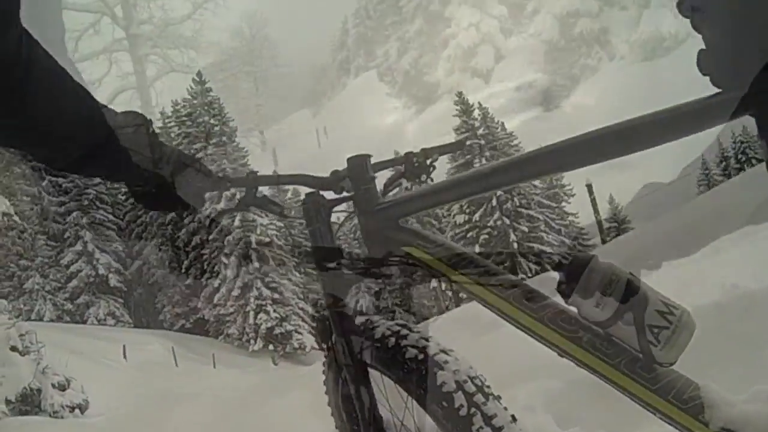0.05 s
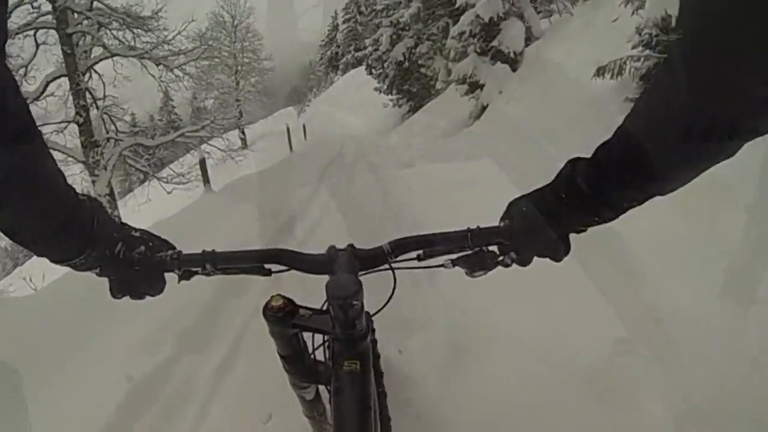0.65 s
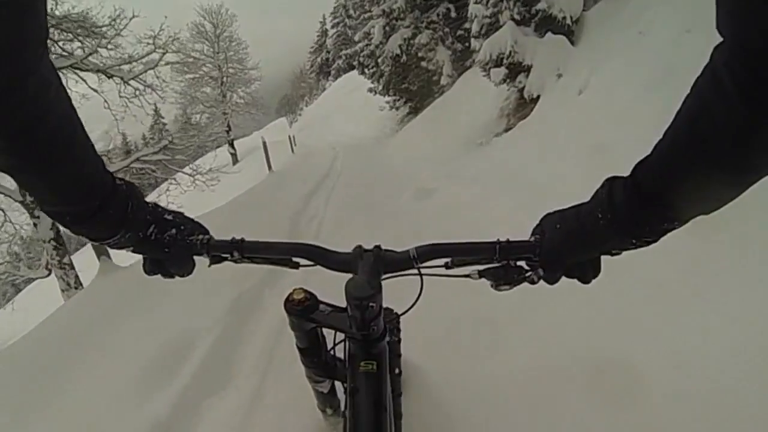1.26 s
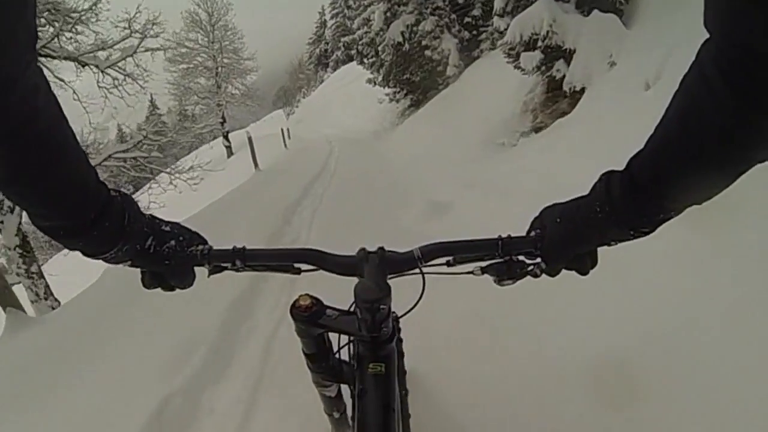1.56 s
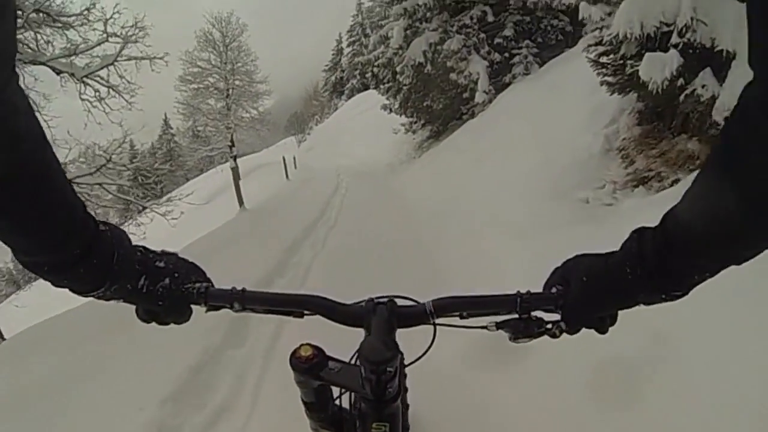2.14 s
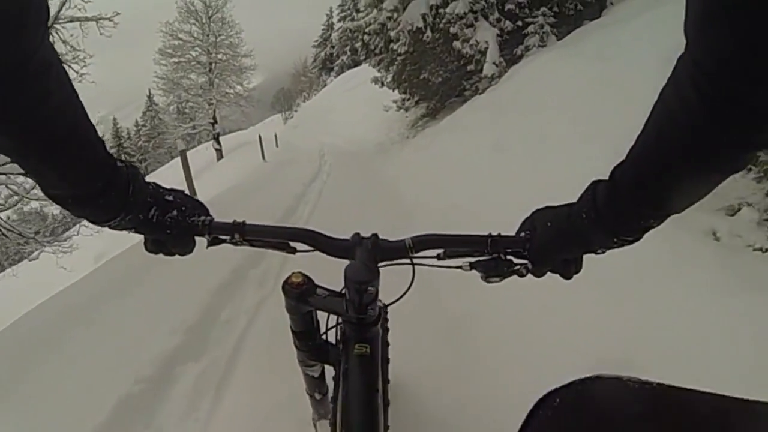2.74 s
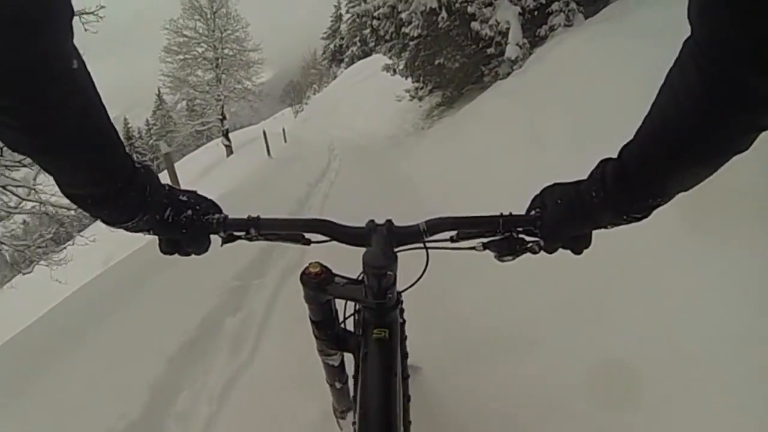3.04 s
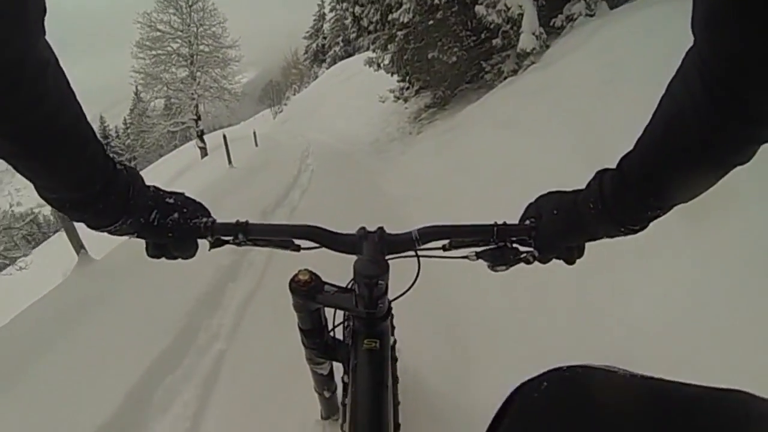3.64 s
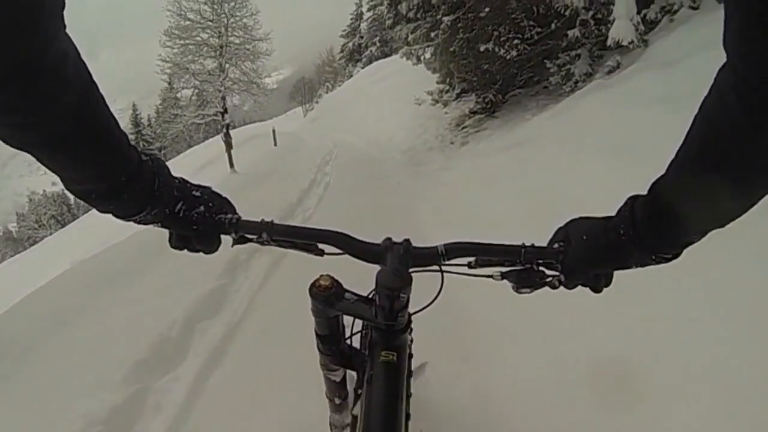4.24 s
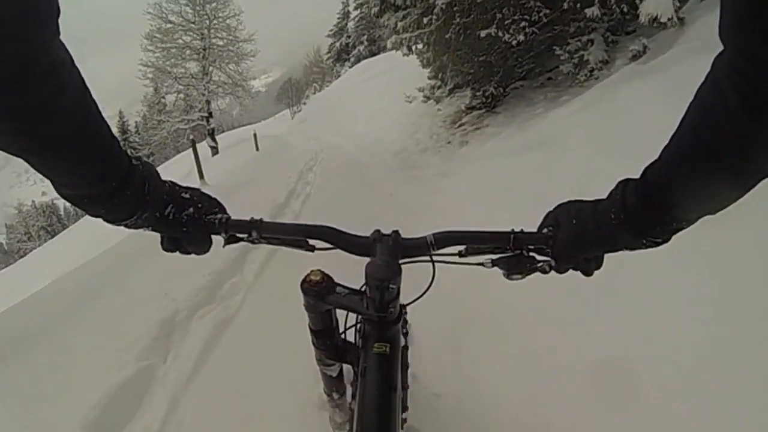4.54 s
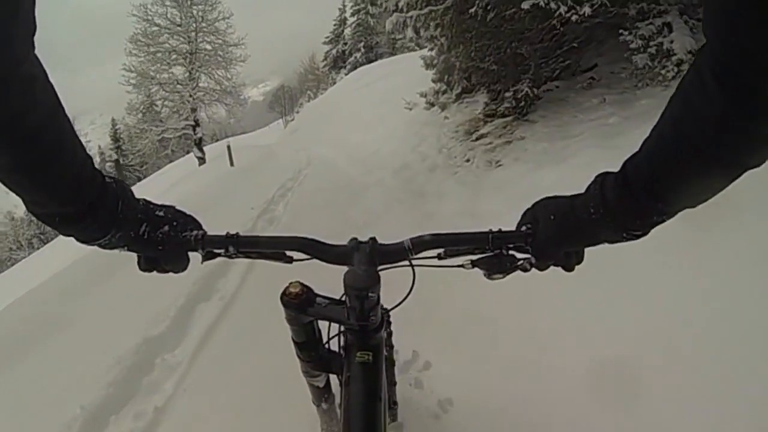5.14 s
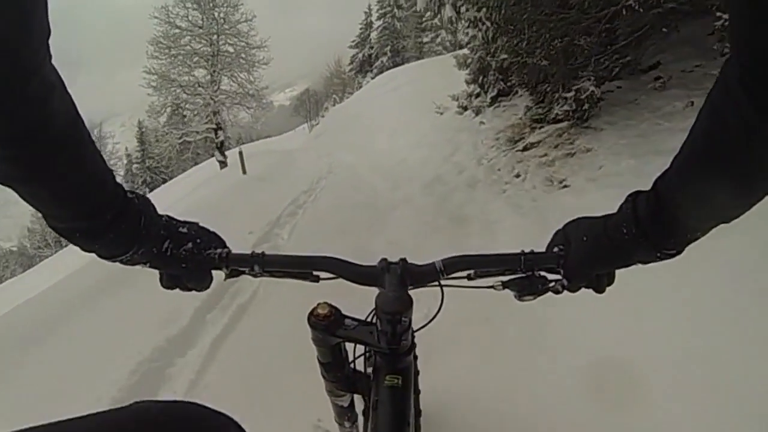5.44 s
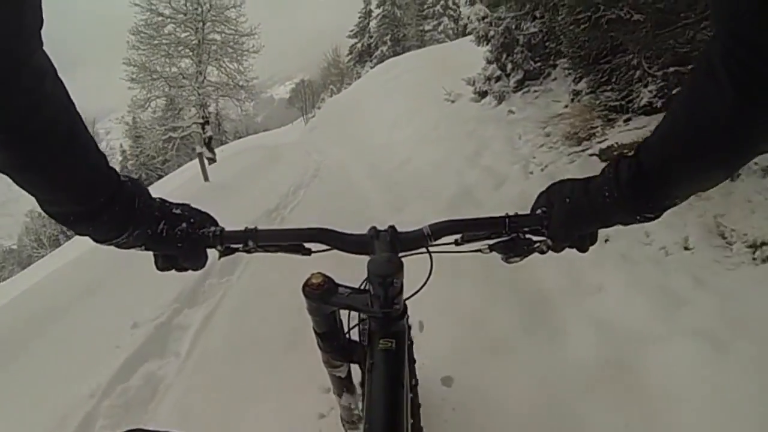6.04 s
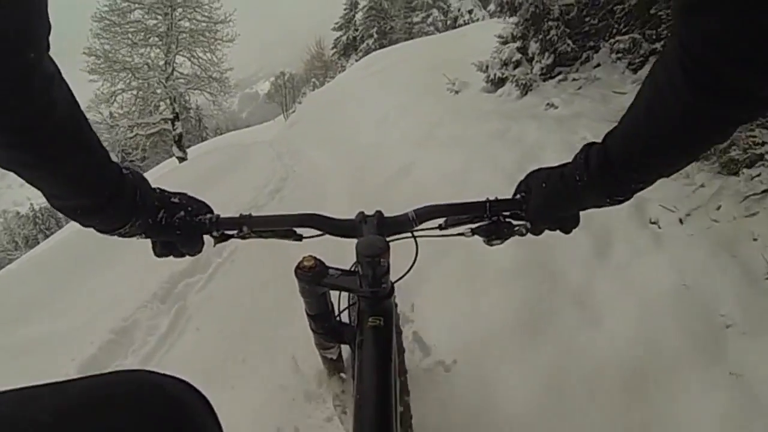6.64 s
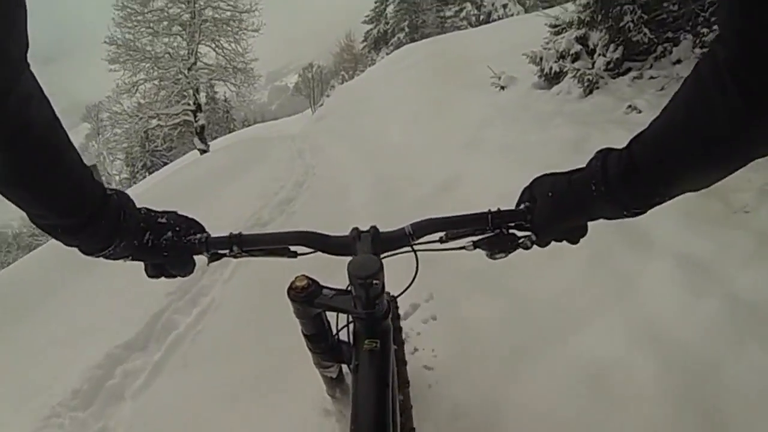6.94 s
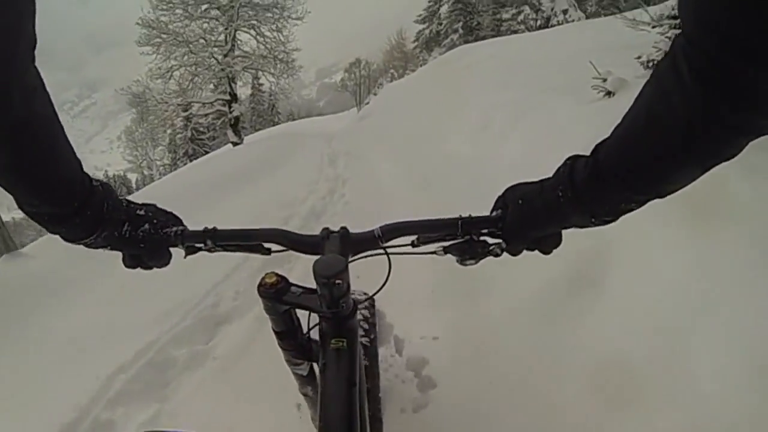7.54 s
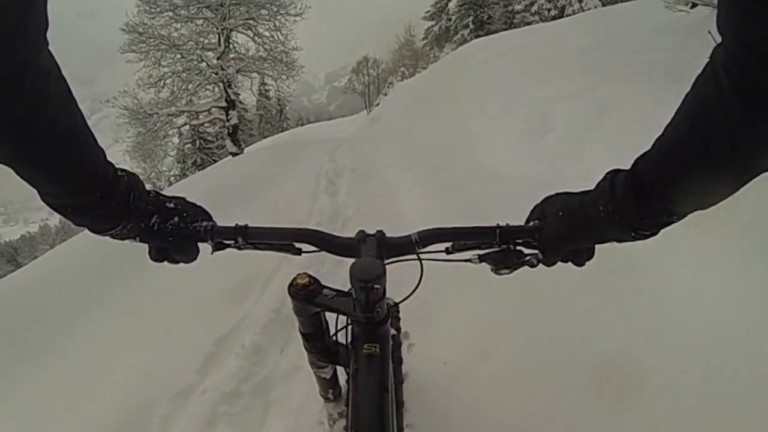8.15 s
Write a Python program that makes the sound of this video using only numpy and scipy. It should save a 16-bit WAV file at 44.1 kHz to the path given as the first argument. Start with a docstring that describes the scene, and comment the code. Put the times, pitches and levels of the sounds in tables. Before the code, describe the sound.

A mountain bike rides through snow, heard from a chest-worn microphone in a closed plastic case that makes everything boxy. Deep wind rumble and uneven buffeting run throughout, over a soft tyre crunch. A cluster of dull thuds comes at about 1 second, and a very faint brake scrape near 2. From 2 to 5.5 seconds the crunch and snow spray surge with the pedalling, nearly three times a second. Snow crumbs and grit tick irregularly on the shell from about 2.7 to 6 seconds, with soft bumps near 4 and 5.4. A muffled knock comes at 6.6 seconds. Just before 7, a hard double knock with a deep thump strikes the case, by far the loudest event. The ride drops in level and swells back over about a second, with a few small knocks, ticks and another faint scrape. Wind and tyres continue until about 8.4 seconds.

```python
"""Mountain bike on snow

A bike rolls along a snowy track, heard from a chest camera in a closed plastic housing.
Wind rumbles and buffets on the case; the tyres crunch and spray snow with each pedal stroke.
Crumbs tick on the shell, bumps thud through the mount and the brake gives a few faint scrapes.
A hard double knock on the case ducks the gain control, and the ride swells back in about a second."""
import sys
import numpy as np
from scipy import signal
from scipy.fft import rfft, irfft, next_fast_len
from scipy.io import wavfile
from scipy.ndimage import uniform_filter1d

SR = 44100
rng = np.random.default_rng(int(sys.argv[2]) if len(sys.argv) > 2 else 0)


def output_pcm(signal):
    """Save a mono or channel-first signal as 16-bit PCM at the path in sys.argv[1].

    Samples are clipped to [-1, 1] before scaling.
    """
    pcm = np.clip(np.atleast_2d(signal).T, -1, 1) * 32767
    wavfile.write(sys.argv[1], SR, np.round(pcm).astype(np.int16))


N = 369999
TIME = np.arange(N) / SR

# EQ curves of the noise layers: f/Hz, relative level/dB
HISS_EQ = [(1000, -13), (9400, -13), (9900, -9), (10300, -9), (10600, -5), (11150, -1.5), (11700, -7),
           (12300, -11), (13500, -36.5), (15000, -40)]
RUMBLE_EQ = [(8, -9.5), (16, 4), (25, -2), (35, 2.5), (45, -16.5), (60, -19.5), (90, -29.5), (130, -41),
             (250, -92)]
BUFFET_EQ = [(50, -4), (90, -4.5), (165, 0), (250, -7), (320, -8.5), (430, -16.5), (600, -18.5), (800, -25),
             (1500, -25), (3000, -46), (8000, -63.5)]
GRIT_EQ = [(1000, -14), (1600, 8), (3000, -3), (5000, 3), (7000, -13), (9500, -3.5), (13000, -15)]
CRUNCH_EQ = [(300, -16), (700, -14), (1150, -19), (1480, -8), (1780, -15), (2050, -16), (2500, -19),
             (3300, -23.5), (3800, -26.5), (6000, -41.5), (12000, -60)]
SPRAY_EQ = [(1000, -17), (2500, 3.5), (3500, -0.5), (4500, 2.5), (5600, -1.5), (7000, -3.5), (8000, -2),
            (9400, -12), (12000, -11), (15000, -22.5)]
# air and wall resonances of the housing: f/Hz, width/Hz, boost/dB
HOUSING_PEAKS = [(970, 66, 10.5), (1420, 250, 7.5), (1570, 94, 7), (2940, 83, 3.5), (3100, 380, 6),
                 (5110, 190, 6)]
# faint whine of the electronics: f/Hz, level/dB
WHINE_TONES = [(2640, -91.5), (2880, -77), (3120, -80.5)]
# fader moves for gusts on the case and for small eddies at its edges: t/s, level before trim/dB
RUMBLE_FADER = [(0.0, -24), (0.09, -26.5), (0.49, -39), (0.54, -31), (1.66, -37), (1.84, -27.5),
                (1.93, -36.5), (2.03, -31), (2.05, -37.5), (2.52, -27.5), (2.59, -32.5), (3.24, -33.5),
                (3.26, -20.5), (3.34, -35.5), (3.55, -27), (3.66, -43), (3.76, -27), (3.92, -37.5),
                (4.06, -24.5), (4.11, -35.5), (4.18, -30), (4.67, -29), (5.06, -35), (5.11, -26),
                (5.25, -44), (5.34, -31), (6.09, -31), (6.14, -19), (6.18, -39.5), (6.25, -26),
                (6.49, -35.5), (6.56, -26), (6.65, -32.5), (6.72, -24.5), (6.86, -40), (6.93, -13.5),
                (6.98, -27), (7.16, -29), (7.89, -28.5), (8.03, -32.5), (8.1, -19.5), (8.24, -31.5),
                (8.29, -25.5), (8.38, -35)]
BUFFET_FADER = [(0.0, -48), (0.3, -51.5), (0.85, -49.5), (0.95, -45), (1.3, -49), (2.5, -47), (2.62, -52),
                (2.8, -48.5), (3.95, -48), (4.12, -51), (4.3, -49.5), (4.9, -46.5), (5.1, -53.5),
                (5.55, -50), (5.63, -48), (5.7, -51), (5.78, -49), (6.0, -48), (6.15, -45.5), (6.26, -40.5),
                (6.33, -48), (6.41, -41), (6.5, -45), (6.9, -44), (7.75, -44), (7.82, -49), (7.95, -49),
                (8.08, -43), (8.38, -44)]
# thin scrapes, like a brake disc brushing its pads: t/s, length/s, f/Hz, width/Hz, level/dB
BRAKE_RUBS = [(1.935, 0.19, 8160, 1500, -73), (1.94, 0.23, 5100, 260, -77), (7.562, 0.2, 4950, 200, -67.5),
              (7.62, 0.16, 6450, 400, -75)]
# dry ticks, like ice grit and the chain: t/s, peak/dB, low cut/Hz, high cut/Hz
DRY_TICKS = [(2.8485, -46, 1500, 5200), (2.955, -47, 1500, 4300), (3.0665, -46, 2200, 7000),
             (3.114, -42, 1700, 5200), (3.126, -51, 2000, 7000), (3.234, -46, 1500, 5000),
             (3.3718, -49.5, 2000, 10000), (3.409, -44, 1500, 4720), (3.496, -44, 1800, 3800),
             (3.8622, -51, 3000, 9000), (4.0191, -48, 2300, 4200), (4.394, -43, 1400, 4190),
             (4.959, -45, 1400, 4000), (4.98, -50, 2010, 4600)]
# the chest mount swinging after a bump: f/Hz, relative level/dB, t60/s
MOUNT_RING = [(88.5, -0.5, 0.084), (184, -1.5, 0.048), (363, -1, 0.029)]
# mount thuds from bumps in the track, and the low thump of the mount under the hard double knock at 6.94 and
# 6.98 s: t/s, peak/dB, high cut/Hz
MOUNT_THUDS = [(0.927, -40, 500), (0.958, -28, 159), (1.007, -23, 422), (1.1, -30.5, 600), (3.982, -26, 257),
               (5.362, -30, 280), (6.581, -30, 684), (6.9428, -5, 130), (6.984, -7.5, 120), (7.131, -24, 398),
               (7.738, -26.5, 201)]
# the shell flicked by a crumb: f/Hz, relative level/dB, t60/s
SHELL_RING = [(1200, -42, 0.0089), (1441, 14.5, 0.021), (1502, 14.5, 0.04), (1950, -8, 0.0082),
              (3060, -1, 0.0099), (3940, -31, 0.0049), (5040, -32, 0.0077)]
# the biggest snow crumbs: t/s, peak/dB, ring pitch/Hz, snap relative to the ring/dB
BIG_CRUMBS = [(2.7588, -31.5, 1490, -15), (2.765, -41, 1610, -26), (2.7841, -35.5, 1470, -12),
              (2.92, -44, 1480, -22), (3.0777, -33.5, 1410, -12), (3.1722, -39, 1500, -20),
              (3.4835, -42, 1550, -24), (3.5902, -33, 1490, -6.5), (3.63, -40, 1530, -22),
              (3.809, -32.5, 1503, -12.5), (3.8212, -34.5, 1510, -18), (3.8627, -30, 1510, -19),
              (3.934, -40.5, 1530, -26), (4.02, -42, 1550, -14), (4.2732, -40.5, 1453, -11),
              (4.3424, -42, 1520, -22), (4.3515, -33.5, 1553, -16), (4.6163, -36.5, 1550, -20),
              (4.622, -41, 1520, -24), (4.7087, -35.5, 1477, -11), (4.9057, -28.5, 1490, -20),
              (5.0828, -42, 1575, -26), (5.3265, -36.5, 1500, -19), (5.3455, -31.5, 1506, -21),
              (5.6277, -42.5, 1510, -22), (5.9254, -33.5, 1466, -29.5), (7.685, -36, 1450, -28),
              (7.717, -35.5, 1500, -16)]
# fader moves for the rolling tyres, before trim: t/s, crunch/dB, spray/dB
TYRE_FADERS = [(0.0, -56, -72.5), (0.8, -56, -69.5), (1.6, -57, -72), (2.2, -56, -68.5), (4.5, -58, -68),
               (5.4, -61, -68.5), (6.9, -53, -70.5), (7.3, -56.5, -65), (7.8, -56.5, -71.5),
               (8.38, -59.5, -71)]
# the tyre digs in, mostly on a pedal stroke: centre t/s, length/s, crunch boost/dB, spray boost/dB
TYRE_SURGES = [(0.94, 0.17, 6.5, -1), (2.006, 0.44, 3.5, 1.5), (2.423, 0.23, 3.5, 5),
               (2.748, 0.47, 4.5, 4.5), (3.155, 0.29, 6, 3), (3.58, 0.34, 4, 6), (3.898, 0.28, 1, 3.5),
               (4.039, 0.23, 9.5, -1.5), (4.343, 0.29, 3, 5.5), (4.674, 0.28, 8, 4.5),
               (5.034, 0.34, 4.5, 6.5), (5.317, 0.4, 9.5, 5), (5.9, 0.13, 2.5, 2), (7.704, 0.31, 4, 5)]
# the case under a blow, and a thin after-ring like a metal buckle: f/Hz, relative level/dB, t60/s
CASE_RING = [(105, -15.5, 0.034), (164, -7, 0.045), (314, -8, .016), (453, -11.5, .017), (615, -16, 0.032),
             (725, -15, 0.04), (912, -10.5, 0.031), (1291, -2.5, 0.019), (1490, -0.5, 0.015),
             (1855, 0.5, 0.016), (2045, -1, 0.015), (2565, -7.5, .012), (2973, -6, 0.015),
             (4000, -18.5, 0.016), (4220, -15, 0.0099), (5430, -18.5, 0.0105), (6520, -16.5, 0.0073),
             (9010, -13.5, 0.0041)]
BUCKLE_RING = [(3250, 0, 0.057), (5160, -9.5, 0.04)]
# knocks on the case; the row at 6.93 s is a brief dull burst leading into the hard double knock:
# t/s, peak before gain control/dB, high cut/Hz, ring pitch/Hz
KNOCKS_AND_LEAD_IN = [(1.0055, -32.5, 636, 1890), (6.5805, -17, 1110, 1960), (6.9303, -6.5, 797, 1930),
                      (6.9405, 20, 6000, 1870), (6.9835, 12.5, 4800, 1935), (7.043, -30, 900, 1870),
                      (7.132, -28.5, 500, 1860), (7.393, -33, 800, 1880), (7.636, -32, 550, 1870),
                      (7.736, -23, 500, 1880), (7.875, -32, 634, 1950)]

SHELL_PITCH_HZ, CASE_PITCH_HZ = 1488, 1863  # root pitches of SHELL_RING and CASE_RING


def from_db(db):
    """Decibels to gain."""
    return 10 ** (np.asarray(db) / 20)


def rms_one(x):
    """Normalise to an rms of 1."""
    return x / np.sqrt(np.mean(x ** 2) + 1e-20)


def peak_one(x):
    """Normalise to a peak of 1."""
    return x / np.abs(x).max()


def low_pass(x, hz):
    """Second-order high cut."""
    return signal.sosfilt(signal.butter(2, min(hz, SR / 2 - 1), fs=SR, output="sos"), x)


def high_pass(x, hz):
    """Second-order low cut."""
    return signal.sosfilt(signal.butter(2, hz, "high", fs=SR, output="sos"), x)


def equalise(x, curve):
    """Shape a steady sound with an EQ curve; rms 1."""
    size = next_fast_len(N)
    hz, db = np.transpose(curve)
    bins = np.arange(size // 2 + 1) * SR / size
    gain = from_db(np.interp(np.log(bins + 1e-9), np.log(hz), db))
    return rms_one(irfft(rfft(x, size) * gain, size)[:N])


def automation(rows):
    """Straight ramps between breakpoints, one curve for each level column."""
    times, *columns = np.transpose(rows)
    return [np.interp(TIME, times, column) for column in columns]


def bell(centre_s, length_s):
    """A smooth swell from 0 to 1 and back."""
    return np.cos(np.pi * np.clip((TIME - centre_s) / length_s, -.5, .5)) ** 2


def drift(rate_hz):
    """Smooth random modulation that rolls off above the rate; rms 1."""
    hop, settle = 40, 2000
    pole = np.exp(-2 * np.pi * rate_hz * hop / SR)
    noise = rng.standard_normal(N // hop + settle + 2)
    slow = signal.lfilter([1], [1, -2 * pole, pole * pole], noise)[settle:]
    return np.interp(np.arange(N) / hop, np.arange(len(slow)), rms_one(slow))


def flutter(rate_hz):
    """Random modulation with the slow swells taken out; rms 1."""
    wander = drift(rate_hz)
    return rms_one(wander - uniform_filter1d(wander, size=SR // 6))


def grains(per_s, spread_db):
    """Random clicks, many small and a few large; rms 1."""
    sizes = from_db(spread_db * np.minimum(rng.exponential(1, N), 4))
    signs = rng.choice([-1, 1], N)
    return rms_one(sizes * signs * (rng.random(N) < per_s / SR))


def snap(low_hz, high_hz, t60):
    """Brittle contact: a burst of noise that dies within milliseconds."""
    t = TIME[:SR // 10]
    burst = rng.standard_normal(len(t)) * np.exp(-np.log(1000) * t / t60)
    band = signal.butter(2, [low_hz, high_hz], "band", fs=SR, output="sos")
    return peak_one(signal.sosfilt(band, burst))


def struck(modes, scatter_db, polarity, tune=1):
    """One blow rings decaying modes; with negative polarity, neighbours swing in opposition."""
    hz, db, t60 = np.transpose(modes)[:, :, None]
    t = TIME[:SR // 10]
    strength = from_db(db + scatter_db * rng.standard_normal(db.shape))
    strength *= polarity ** np.arange(len(db))[:, None]
    decay = np.exp(-np.log(1000) * t / t60)
    ring = np.sum(strength * np.sin(2 * np.pi * tune * hz * t) * decay, axis=0)
    attack = 1 - np.exp(-t / .00025)
    all_pass = [[-.7, 1, 0, 1, -.7, 0]]  # bending waves bring the highs just ahead of the lows
    return peak_one(signal.sosfilt(all_pass, ring * attack))


def housing(x):
    """Boxy colour: each resonance of the closed case boosts its own band; rms 1."""
    out = x
    for hz, width_hz, boost_db in HOUSING_PEAKS:
        band = signal.lfilter(*signal.iirpeak(hz, hz / width_hz, fs=SR), x)
        out = out + (from_db(boost_db) - 1) * band
    return rms_one(out)


def add(out, s, peak_db, sound):
    """Drop a one-shot into the mix at a time and a peak level."""
    at = round(s * SR)
    out[at:at + len(sound)] += (from_db(peak_db) * peak_one(sound))[:N - at]


def camera_noise():
    """The noise floor: thin hiss and whine from the camera's electronics."""
    whine = sum(from_db(db) * np.sqrt(2) * np.sin(2 * np.pi * hz * TIME) for hz, db in WHINE_TONES)
    return whine + from_db(-73) * equalise(rng.standard_normal(N), HISS_EQ)


def wind():
    """Big eddies press on the case as a deep rumble; small ones buffet it in lumps."""
    rumble_trim_db, buffet_trim_db, gust_db = 3, -1.09, 2
    rumble_db = automation(RUMBLE_FADER)[0] + rumble_trim_db + gust_db * flutter(rate_hz=6.2)
    buffet_db = automation(BUFFET_FADER)[0] + buffet_trim_db
    eddies = equalise(rng.standard_normal(N), RUMBLE_EQ)
    eddies /= np.sqrt(uniform_filter1d(eddies ** 2, size=SR // 8) + 1e-3)  # levelled before the fader
    lumps = rng.standard_normal(N) * from_db(3.1 * flutter(rate_hz=25))
    return from_db(rumble_db) * eddies + from_db(buffet_db) * equalise(lumps, BUFFET_EQ)


def brake_rubs():
    """Light pad friction comes on, holds and lets go in narrow resonances that catch and waver."""
    out = np.zeros(N)
    fade_s = 0.036
    catching = from_db(2 * flutter(rate_hz=37))
    waver_hz = 50 * drift(rate_hz=12)
    for s, length_s, hz, width_hz, level_db in BRAKE_RUBS:
        carrier = np.sin(2 * np.pi * np.cumsum(hz + waver_hz) / SR)
        band = low_pass(rng.standard_normal(N), width_hz / 2) * carrier
        swell = np.clip(np.minimum(TIME - s, s + length_s - TIME) / fade_s, 0, 1)
        out += from_db(level_db) * swell * rms_one(band * catching)
    return out


def ticks():
    """Tiny hard contacts down at the bike, too light to ring the shell; each has its own brightness."""
    out = np.zeros(N)
    for s, peak_db, low_hz, high_hz in DRY_TICKS:
        add(out, s, peak_db, housing(snap(low_hz, high_hz, t60=0.0085)))
    return out


def grit():
    """Each surge of the tyre throws a short shower of icy grains, bright and crackly."""
    shower = sum(bell(s, 0.6 * length_s) * from_db(spray_db) for s, length_s, _, spray_db in TYRE_SURGES)
    crackle = equalise(grains(per_s=190, spread_db=0.5), GRIT_EQ)
    return from_db(-70.5) * shower * housing(crackle)


def jolts():
    """Bumps come up through the rider and swing the mount, as does the hard double knock on the case: round
    thuds with no clack."""
    out = np.zeros(N)
    for s, peak_db, high_cut_hz in MOUNT_THUDS:
        swing = struck(MOUNT_RING, scatter_db=0.5, polarity=-1.06)
        add(out, s, peak_db, low_pass(swing, high_cut_hz))
    return out


def small_crumbs():
    """Random soft hits, in rows like BIG_CRUMBS: the harder the tyre digs, the more crumbs fly."""
    full_dig_per_s, least_dig = 20, .4
    peak_db, snap_db = -47, -13
    dig = np.maximum(sum(bell(s, length_s) for s, length_s, _, _ in TYRE_SURGES), least_dig)
    in_deep_snow = (TIME > 1.9) & (TIME < 5.4)
    times = TIME[rng.random(N) < full_dig_per_s * dig * in_deep_snow / SR]
    scatter = rng.standard_normal((len(times), 2))
    return [(s, peak_db + 1.5 * size, SHELL_PITCH_HZ * (1 + 0.061 * spot), snap_db)
            for s, (size, spot) in zip(times, scatter)]


def crumbs():
    """Clumps off the front wheel pat on the shell, each spot with its own pitch; icy ones snap."""
    out = np.zeros(N)
    for s, peak_db, pitch_hz, snap_db in list(BIG_CRUMBS) + small_crumbs():
        ring = struck(SHELL_RING, scatter_db=3, polarity=1, tune=pitch_hz / SHELL_PITCH_HZ)
        crack = peak_one(housing(snap(low_hz=2500, high_hz=4900, t60=0.017)))
        add(out, s, peak_db, high_pass(ring, hz=1050) + from_db(snap_db) * crack)
    return out


def tyres():
    """Snow packs under the knobs in tiny fractures and flies off as spray, surging as the tyre digs."""
    crunch_trim_db, spray_trim_db = -2.5, -0.5
    crunch_db, spray_db = automation(TYRE_FADERS)
    for s, length_s, crunch_boost_db, spray_boost_db in TYRE_SURGES:
        dig = bell(s, length_s)
        crunch_db += crunch_boost_db * dig
        spray_db += spray_boost_db * dig
    fractures = grains(per_s=1500, spread_db=4) + 0.81 * rng.standard_normal(N)
    fractures *= from_db(1.5 * flutter(rate_hz=14))  # uneven snow under the tyre
    coarse = .4 * grains(per_s=150, spread_db=3.5)
    powder = grains(per_s=2900, spread_db=3.5) + coarse + 1.1 * rng.standard_normal(N)
    crunch = from_db(crunch_db + crunch_trim_db) * housing(equalise(fractures, CRUNCH_EQ))
    spray = from_db(spray_db + spray_trim_db) * housing(equalise(powder, SPRAY_EQ))
    return crunch + spray


def knocks():
    """Hard contacts clack the case, each at its own pitch; a dull burst leads into the loudest pair."""
    out = np.zeros(N)
    null_hz, null_width_hz = 1110, 160  # here the case wall stands still at the microphone
    notch = signal.iirnotch(null_hz, null_hz / null_width_hz, fs=SR)
    for s, peak_db, high_cut_hz, pitch_hz in KNOCKS_AND_LEAD_IN:
        ring = struck(CASE_RING, scatter_db=1, polarity=-1, tune=pitch_hz / CASE_PITCH_HZ)
        body = high_pass(signal.lfilter(*notch, ring), hz=88)
        tail = from_db(-37.5) * struck(BUCKLE_RING, scatter_db=1, polarity=1)
        edge = from_db(-15.5) * snap(low_hz=3200, high_hz=14000, t60=0.009)
        blow = low_pass(body + tail + edge, high_cut_hz)
        # a blunt contact has no sharp edge, so the treble falls away faster still
        add(out, s, peak_db, low_pass(blow, 3 * high_cut_hz))
    return out


def scene():
    """The mono mix at the microphone, from noise floor to knocks."""
    bed = camera_noise() + wind()
    ride = brake_rubs() + ticks() + grit() + jolts() + crumbs() + tyres()
    return (bed + ride + knocks())[None]


def gain_control(x, ceiling_db, release_db_per_s, ahead_s):
    """The gain ducks just ahead of an overload and climbs back at a steady rate."""
    window = SR // 300
    level_db = 10 * np.log10(np.maximum(uniform_filter1d(x ** 2, size=window), 1e-12))
    over_db = np.maximum(level_db - ceiling_db, 0)
    climb_db = release_db_per_s * TIME
    duck_db = np.maximum.accumulate(over_db + climb_db) - climb_db
    duck_db = np.interp(TIME + ahead_s, TIME, uniform_filter1d(duck_db, size=window))
    return x * from_db(-duck_db)


def record(dry):
    """The camera's chain: gain control, clipping at full scale and a steep high cut at 15 kHz."""
    ducked = gain_control(dry[0], ceiling_db=-7, release_db_per_s=20.5, ahead_s=.009)
    high_cut = signal.ellip(10, .1, 90, 15000, fs=SR, output="sos")
    return signal.sosfilt(high_cut, np.clip(ducked, -1, 1))[None]


dry = scene()
out = record(dry)
output_pcm(out)
```